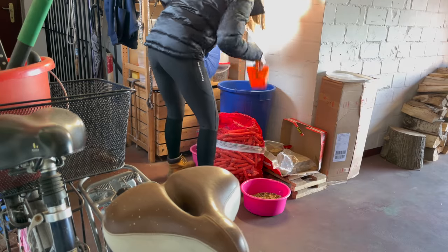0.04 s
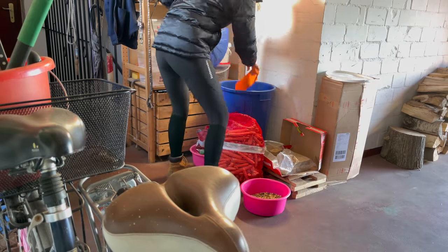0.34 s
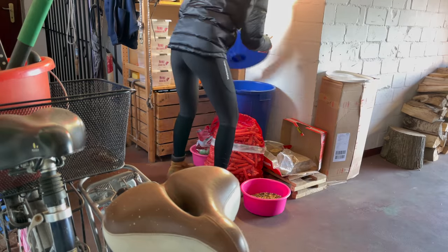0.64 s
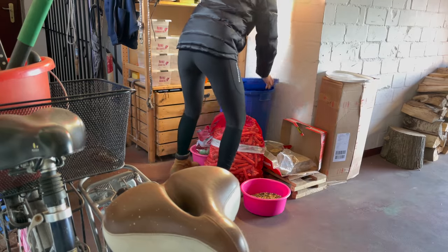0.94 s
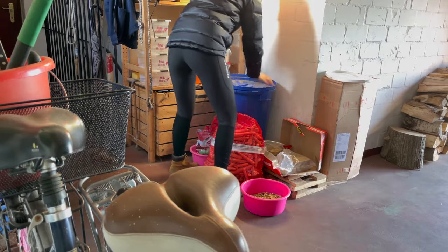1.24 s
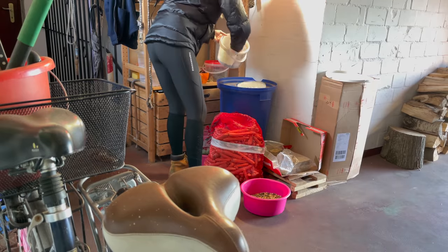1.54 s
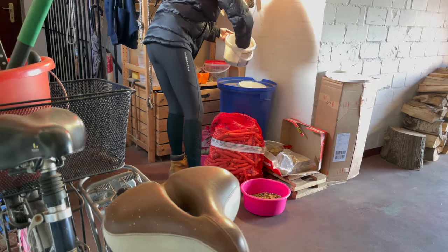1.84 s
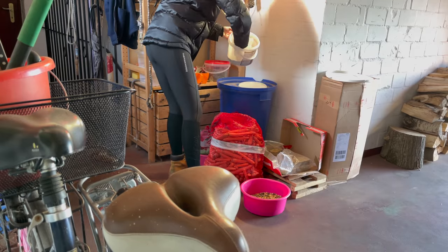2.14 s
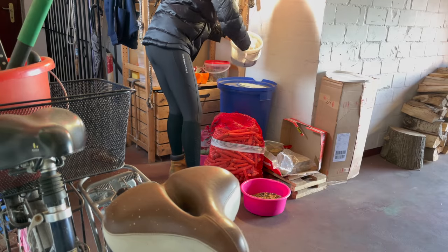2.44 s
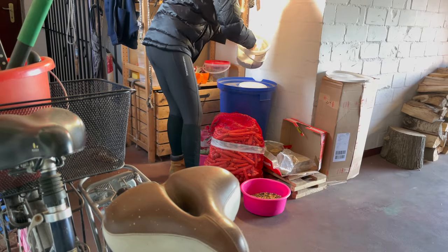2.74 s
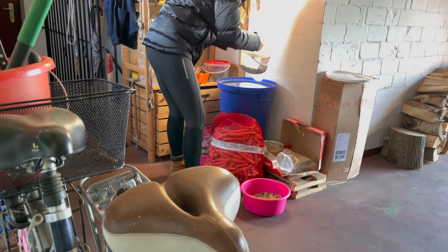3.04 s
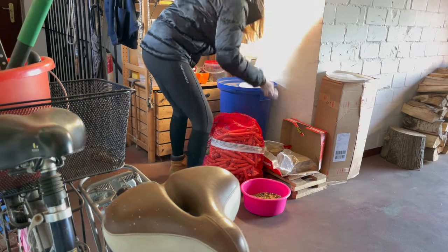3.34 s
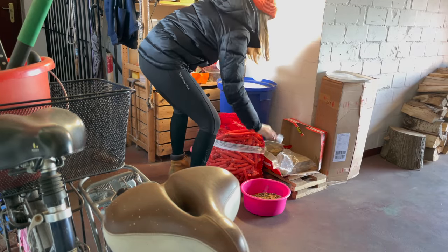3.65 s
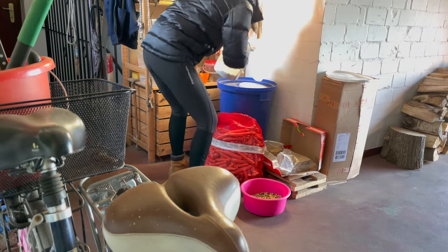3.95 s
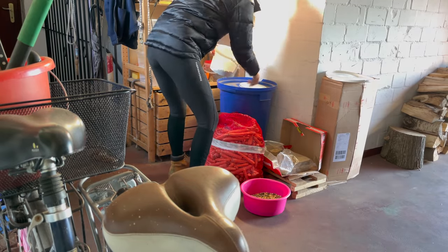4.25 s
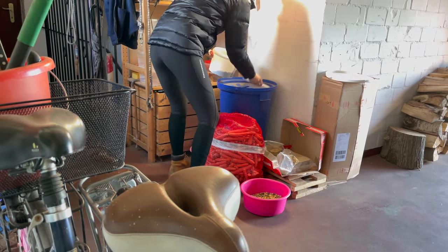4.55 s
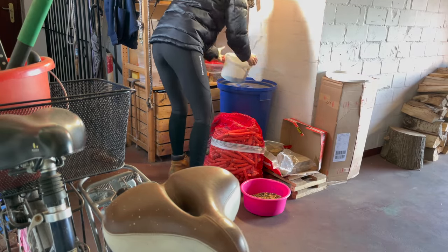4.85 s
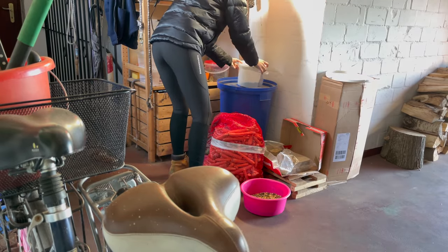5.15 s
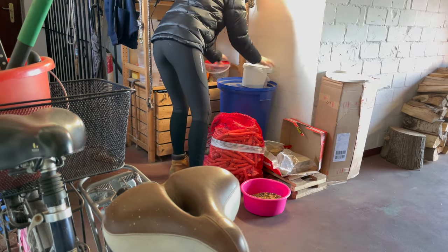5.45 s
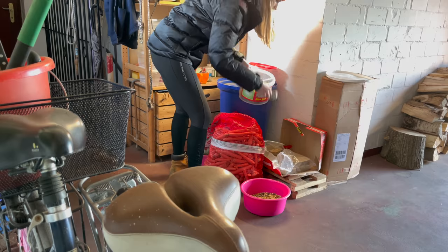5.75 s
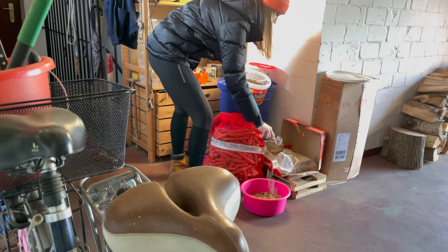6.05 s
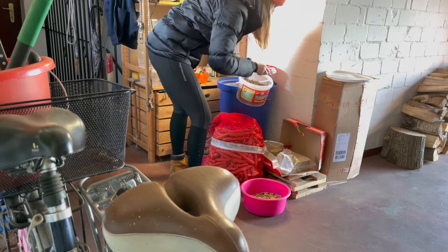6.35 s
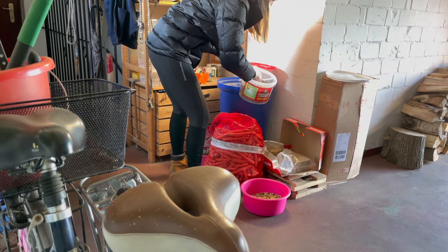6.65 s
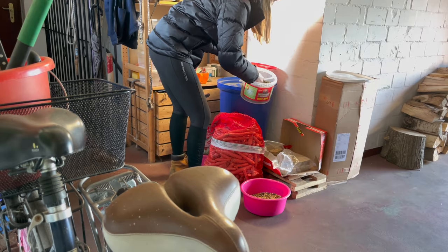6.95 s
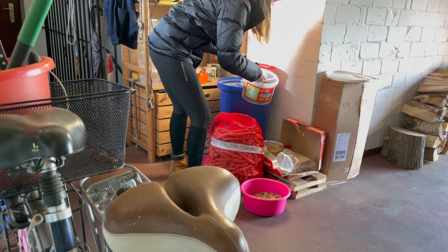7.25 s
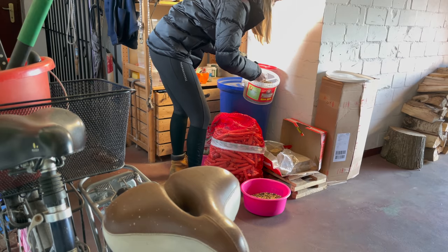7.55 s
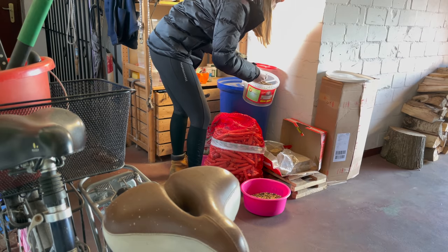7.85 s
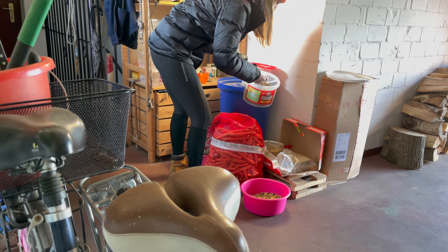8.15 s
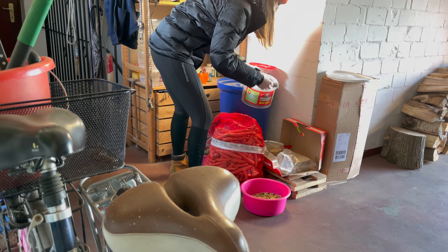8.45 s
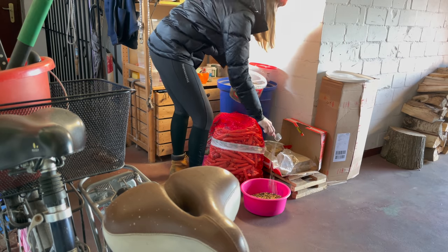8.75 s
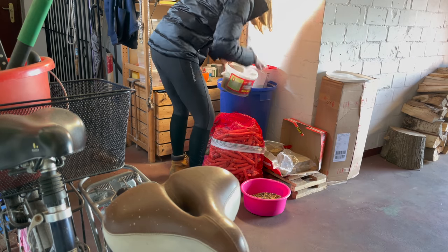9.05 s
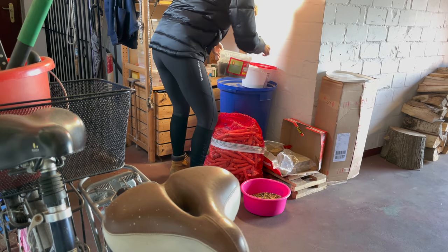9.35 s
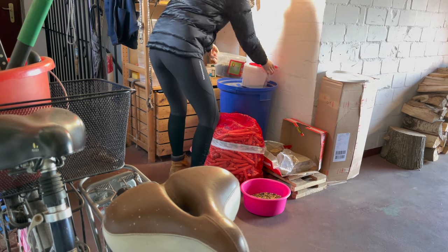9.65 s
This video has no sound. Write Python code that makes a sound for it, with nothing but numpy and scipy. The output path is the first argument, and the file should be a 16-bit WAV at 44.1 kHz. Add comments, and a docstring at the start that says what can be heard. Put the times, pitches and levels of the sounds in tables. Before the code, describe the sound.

Hollow plastic knocks and a booming lid, dry pellets sliding, and a measuring spoon digging, tapping and clattering in a store room.

```python
"""A plastic feed barrel is knocked and lidded a few metres away in a brick store room: the wall clacks
and rings, the air inside booms. A scoop is put down; dry feed slides and ticks in a tipped container.
A measuring spoon digs in a small tub, scrapes and taps its wall, and is dropped back in.
Three spoonfuls hiss into a bowl. A low drone wavers underneath."""
import sys
import numpy as np
from scipy import signal
from scipy.fft import rfft, irfft, next_fast_len
from scipy.io import wavfile
from scipy.ndimage import uniform_filter1d, map_coordinates

SR = 44100
rng = np.random.default_rng(int(sys.argv[2]) if len(sys.argv) > 2 else 0)


def inscribe(sig):
    """Save sig as 16-bit PCM at rate SR to the path in sys.argv[1].

    A 1-D sig is mono; a 2-D sig holds one channel per row.
    Samples are clipped to [-1, 1] before scaling.
    """
    pcm = np.round(np.clip(np.atleast_2d(sig).T, -1, 1) * 32767)
    wavfile.write(sys.argv[1], SR, pcm.astype(np.int16))


N = 432621

# friction on plastic: freq_hz, level_db
RUB_SPECTRUM = [(210, -12), (350, -6), (613, -9.5), (685, -8.5), (1240, -11), (1340, -4), (2390, -11.5),
                (4310, -17.5), (9000, -34), (11100, -22.5), (13600, -25), (16000, -37)]
# top treble of hard contacts: freq_hz, level_db
FIZZ_SPECTRUM = [(5000, 5.5), (8000, -6.5), (10500, -2), (13000, 4.5), (14500, 0), (16000, -27)]


def amp(db):
    """Decibels to gain."""
    return 10 ** (np.asarray(db) / 20)


def unit(x):
    """Scale to rms 1."""
    return x / np.sqrt(np.mean(x ** 2) + 1e-20)


def along(points, hz):
    """Interpolate (freq_hz, value) points on a log frequency axis."""
    knots_hz, values = np.transpose(points)
    return np.interp(np.log(hz + 1), np.log(knots_hz + 1), values)


def wobble(rate_hz):
    """Smooth random curve with rate_hz knots a second."""
    knots = rng.standard_normal(int(N * rate_hz / SR) + 4)
    return map_coordinates(knots, [np.arange(N) * rate_hz / SR])


def filtered(x, response):
    """Apply a complex frequency response."""
    size = x.shape[-1]
    padded = next_fast_len(size + 8192)
    return irfft(rfft(x, padded) * response(np.fft.rfftfreq(padded, 1 / SR)), padded)[..., :size]


def causal(x, gain):
    """Minimum-phase filter from gains on an even frequency grid."""
    cepstrum = irfft(np.log(gain + 1e-6))
    half = len(cepstrum) // 2
    cepstrum[1:half] *= 2
    cepstrum[half + 1:] = 0
    return signal.oaconvolve(x, irfft(np.exp(rfft(cepstrum))))[:len(x)]


def coloured(x, spectrum, size=2048):
    """Shape x by a (freq_hz, level_db) spectrum."""
    return causal(x, amp(along(spectrum, np.fft.rfftfreq(size, 1 / SR))))


def resonate(x, modes):
    """Parallel (freq_hz, width_hz, level_db) resonators."""
    return filtered(x, lambda f: sum(amp(db) * 1j * f * width / (hz * hz - f * f + 1j * f * width)
                                     for hz, width, db in modes))


def favour(hz, centre_hz, lift_db, octaves=0.3):
    """Boost in dB for modes near the struck spot's own pitch."""
    return lift_db * np.exp(-(np.log2(hz / centre_hz) / octaves) ** 2)


def swell(peak_s, db, rise_db_per_s, fall_db_per_s, hold_s=0, sag_db_per_s=0):
    """Envelope: builds until peak_s, sags while held, dies away."""
    age_s = np.arange(N) / SR - peak_s
    loss_db = (rise_db_per_s * np.maximum(-age_s, 0)
               + sag_db_per_s * np.clip(age_s, 0, hold_s)
               + fall_db_per_s * np.maximum(age_s - hold_s, 0))
    return amp(db - np.minimum(loss_db, 200))


def strokes(rows, rise_db_per_s, sag_db_per_s, fall_db_per_s):
    """Envelope of (start_s, length_s, level_db) movements of one shape."""
    return sum(swell(start_s, db, rise_db_per_s, fall_db_per_s, length_s, sag_db_per_s)
               for start_s, length_s, db in rows)


def grains(rate_hz, spread_db):
    """Tiny impacts at random times, mostly small, a few large."""
    place, size, sign = rng.random((int(rate_hz * N / SR), 3)).T
    strength = amp(spread_db * np.minimum(-np.log(1 - size), 4)) * np.sign(sign - .5)
    return unit(np.bincount((place * N).astype(int), strength, N))


def burst(t60_s, chatter_db, chatter_t60_s, rise_s, size=8192):
    """Contact: a pitchless crack as surfaces meet, then weaker chatter of loose plastic."""
    t = np.arange(size) / SR
    onset = 1 - np.exp(-t / max(rise_s, 1e-4))
    decay = amp(-60 * t / t60_s) + amp(chatter_db - 60 * t / chatter_t60_s)
    crack = rng.standard_normal(size) * onset * decay
    power = np.abs(uniform_filter1d(np.abs(rfft(crack)) ** 2, size=21))
    return causal(crack, (power / power.mean() + 1e-3) ** -0.35)  # partial whitening


def ring(modes, attack_s, scatter_db, detune=0.032, size=16384):
    """Damped modes, struck at a new spot each time."""
    t = np.arange(size) / SR
    tones = np.zeros(size)
    for hz, db, t60_s in modes:
        cycles = hz * (1 + detune * rng.normal()) * t + rng.random()
        tones += amp(db + scatter_db * rng.normal() - 60 * t / t60_s) * np.sin(2 * np.pi * cycles)
    return tones * (1 - np.exp(-t / attack_s))


def add(track, start_s, db, hit):
    """Mix in a hit, its first 1024 samples at rms level db."""
    start = round(start_s * SR)
    opening_rms = np.sqrt(np.mean(hit[:1024] ** 2))
    track[start:start + len(hit)] += (amp(db) * hit / opening_rms)[:N - start]


def diffuse(pair):
    """Room field from two unrelated signals: alike in the bass, unrelated above."""
    # left-right likeness: freq_hz, coherence
    likeness = [(60, 0.99), (130, 0.97), (290, 0.54), (600, 0), (8000, 0.043)]

    def mid_side_gains(hz):
        angle = np.arccos(np.clip(along(likeness, hz), -1, 1)) / 2
        return np.array([np.cos(angle), np.sin(angle)])

    mid, side = filtered(pair, mid_side_gains)
    return np.array([mid + side, mid - side])


def even(tail):
    """Level a reverb tail's chance peaks so the walls add no note."""
    power = np.abs(rfft(tail[:4096])) ** 2
    near, broad = (np.abs(uniform_filter1d(power, size=bins)) + 1e-12 for bins in (9, 121))
    return causal(tail, np.sqrt(broad / near))


def in_room(x, wet_db, left_db, block=24576, overlap=1024):
    """Direct sound, left microphone first, plus wall reflections that vary as things move."""
    # room decay: freq_hz, t60_s
    decay = [(100, 0.67), (300, 0.87), (1000, 0.6), (2500, 0.43), (6000, 0.45), (14000, 0.25)]
    # reverb colour: freq_hz, level_db
    wet_spectrum = [(60, -18.5), (130, -5), (300, 1.5), (16000, 3)]
    hz, t, noise = signal.stft(rng.standard_normal((2, 3 * SR)), SR, nperseg=256)
    length = SR * 2 // 3
    count = length // 128 + 2
    age_s = np.arange(length) / SR
    fade = amp(-60 * t[:count] / along(decay, hz)[:, None])
    early = (1 - np.exp(-age_s / 0.00029)) * (1 + 2.6 * np.exp(-age_s / 0.0055))  # near walls loudest
    window = np.sqrt(np.abs(signal.windows.tukey(block, 2 * overlap / block)))
    wet = np.zeros((2, N + block + length))
    for start in range(0, N, block - overlap):  # new tail per block
        piece = x[start:start + block] * window[:N - start]
        frames = noise[..., rng.integers(noise.shape[-1] - count):][..., :count]
        tail = signal.istft(frames * fade, SR, nperseg=256)[1][:, :length] * early
        tail = np.array([even(side) for side in tail])
        reverb = signal.fftconvolve(piece[None], tail / np.linalg.norm(tail[0]), axes=1)
        wet[:, start:start + reverb.shape[1]] += reverb
    wet = filtered(diffuse(wet[:, :N]), lambda f: amp(along(wet_spectrum, f)))
    lag_s = 20 / SR
    right = filtered(x, lambda f: np.exp(-2j * np.pi * f * lag_s))
    return np.array([amp(left_db) * x, right]) + amp(wet_db) * wet


def background(drone_hz=52.0):
    """A distant, wavering drone over the still air of the room."""
    # drone envelope: time_s, level_db
    drone_levels = [(0, -73), (.95, -51), (5.529, -43.5), (5.6, -31.5), (5.78, -42), (5.87, -35),
                    (6.57, -35.5), (6.67, -42.5), (7.0, -33), (7.3, -36), (7.52, -46.5), (7.65, -34.5),
                    (8.0, -33.5), (8.08, -41), (8.18, -33), (8.4, -30.5), (8.55, -36.5), (8.8, -33.5),
                    (9.05, -43), (9.4, -36.5), (9.81, -34.5)]
    # room air: freq_hz, level_db
    air_spectrum = [(15, -57), (25, -6), (80, 2), (531, -20.5), (936, -11.5), (1840, -17), (2990, -29.5),
                    (4030, -27.5), (5570, -38.5), (7920, -37), (8590, -53), (11000, -31), (13600, -31),
                    (16000, -42)]
    phase = 2 * np.pi * np.cumsum(drone_hz + 1.985 * wobble(20)) / SR
    envelope = amp(np.interp(np.arange(N) / SR, *np.transpose(drone_levels)))
    drone = envelope * unit(np.sin(phase) * amp(1.9 * wobble(13)))
    air = np.array([coloured(rng.standard_normal(N), air_spectrum) for _ in range(2)])
    return drone + amp(-47.5) * unit(diffuse(air))


def handling():
    """Plastic and clothing catch and slip; the jostled barrel rumbles."""
    # rubbing: start_s, length_s, level_db
    rubs = [(0.0, 0.027, -32.5), (.61, 0.051, -33), (.99, 0.069, -44), (1.56, 0.26, -34), (3.15, 0.54, -51),
            (4.36, 0.16, -41.5), (4.88, 0.19, -41.5), (5.37, 0.087, -39.5), (9.4, 0.4, -45)]
    # barrel jostled: start_s, length_s, level_db
    jostles = [(.85, 0.29, -24.5), (1.4, 0.6, -27.5), (2.0, 0.32, -35), (2.74, 0.25, -32.5),
               (3.1, 0.43, -36), (4.33, 0.075, -38.5), (4.99, 0.11, -24.5), (5.2, 0.16, -35)]
    # barrel cavity: freq_hz, level_db
    cavity_spectrum = [(40, -36), (65, -18), (87, 4), (115, -5.5), (140, 12), (175, -2.5), (225, -11.5),
                       (330, -7), (430, -16), (600, -22), (900, -59)]
    rub = unit(coloured(grains(rate_hz=1500, spread_db=4.0) * amp(0.75 * wobble(30)), RUB_SPECTRUM))
    hollow = unit(coloured(grains(rate_hz=270, spread_db=4.5), cavity_spectrum))
    rubbing = strokes(rubs, rise_db_per_s=258, sag_db_per_s=8, fall_db_per_s=178)
    jostling = strokes(jostles, rise_db_per_s=296, sag_db_per_s=10.5, fall_db_per_s=145)
    return amp(-6.0) * rubbing * rub + amp(-5.0) * jostling * hollow


def bowl():
    """Fine granules rain in small clumps on the feed in the bowl."""
    # spoonfuls landing: start_s, length_s, level_db
    spoonfuls = [(3.592, 0.082, -37), (6.005, 0.14, -36), (8.787, 0.12, -33)]
    # granule hiss: freq_hz, level_db
    hiss_spectrum = [(150, -11), (250, -4.5), (380, -3.5), (484, -0.5), (816, -9), (1000, -9.5),
                     (1790, -10.5), (2360, -7), (3120, -14.5), (4990, -10.5), (5540, -16.5), (6700, -12.5),
                     (8400, -13), (9330, -15), (13400, 4), (16000, -15.5)]
    shower = strokes(spoonfuls, rise_db_per_s=4000, sag_db_per_s=-1.5, fall_db_per_s=249)
    clumps = grains(rate_hz=3900, spread_db=5.5) * amp(2.5 * wobble(70))
    return shower * unit(coloured(clumps, hiss_spectrum))


def spoon_clicks():
    """Spoon and handles clink or knock, and a first pellet strikes the bowl; the contact spot sets the main
    resonance."""
    # light contacts: start_s, level_db, pitch_hz, width_hz, rise_s
    clicks = [(.394, -48, 1800, 1210, 0.016), (3.483, -35, 3300, 550, 0.0045),
              (3.645, -37, 2190, 2200, 0.0021), (3.807, -46.5, 2010, 1490, 0.0019),
              (5.794, -33, 3140, 450, 0.0098), (6.006, -41.5, 1290, 700, .0004),
              (6.110, -30.5, 2400, 380, 0.0008), (6.113, -36, 1480, 260, 0.00074),
              (6.202, -39, 2240, 450, 0.00049), (8.529, -44, 3120, 400, 0.01),
              (8.557, -38.5, 3030, 700, 0.019), (8.788, -44, 1800, 2000, .0004),
              (8.833, -39, 2390, 1800, .0005)]
    tilt_hz_db = [(500, -6.0), (1300, 11.0), (6500, 2.5), (9000, -1.5)]
    out = np.zeros(N)
    for start_s, db, pitch_hz, width_hz, rise_s in clicks:
        contact = burst(t60_s=0.0079 + 4 * rise_s, chatter_db=-51, chatter_t60_s=0.12, rise_s=rise_s)
        click = resonate(contact, [(pitch_hz, width_hz, 0), (6100, 500, -12)])
        add(out, start_s, db, coloured(click, tilt_hz_db))
    return out


def dropped_spoon():
    """The spoon lands on one end, then the other, and clatters against the tub."""
    # bounces: start_s, level_db, pitch_hz
    bounces = [(9.235, -27, 12500), (9.243, -30, 3000), (9.256, -38.5, 1900), (9.295, -43, 3000),
               (9.345, -40, 1800), (9.368, -42, 1900)]
    # spoon resonances: freq_hz, width_hz, level_db
    spoon_modes = [(488, 62, -0.5), (1540, 200, -16), (1807, 100, 5), (2160, 290, -3), (2995, 130, 4.5),
                   (4740, 1500, -9), (6100, 660, -6.5), (8300, 240, -4), (11700, 430, 1), (13300, 500, 1)]
    out = np.zeros(N)
    for start_s, db, pitch_hz in bounces:
        flex = 1 + 0.005 * rng.normal()
        modes = [(hz * flex, width_hz, mode_db + favour(hz, pitch_hz, lift_db=6.0))
                 for hz, width_hz, mode_db in spoon_modes]
        contact = burst(t60_s=0.015, chatter_db=-10, chatter_t60_s=0.09, rise_s=0.00074)
        add(out, start_s, db - 1.0, resonate(contact, modes))
    return out


def pellets():
    """Single pellets tumble in the container: a dry tick with a fizz of crumbs."""
    # pellet impacts: start_s, level_db, pitch_hz, fizz_offset_db
    tumbles = [(1.559, -33, 1800, -17), (1.823, -34.5, 1690, -26), (1.949, -36.5, 1900, -19),
               (1.986, -36.5, 1900, -18), (2.076, -34, 3130, -8), (2.297, -32, 2860, -23),
               (2.36, -39, 3000, -23), (2.562, -34, 2020, -16), (2.69, -35.5, 1680, -29),
               (2.717, -43, 1400, -24), (2.754, -49, 1500, -0.5), (2.776, -47, 2200, -2),
               (2.823, -40, 1620, -20), (2.864, -48, 3780, -5), (2.89, -44, 1310, -17),
               (2.926, -47, 1400, -21), (2.945, -39.5, 1600, -21), (3.122, -45.5, 1700, -34),
               (3.179, -56, 1300, -28), (3.435, -53, 3500, 0)]
    # pellet tick: freq_hz, level_db
    tick_spectrum = [(300, -19), (900, 9), (1900, -3.5), (3000, -6), (4800, -9), (6000, -30), (9000, -47)]
    out = np.zeros(N)
    for start_s, db, pitch_hz, fizz_offset_db in tumbles:
        contact = burst(t60_s=0.015, chatter_db=-32, chatter_t60_s=0.064, rise_s=0.0008)
        spectrum = [(hz, band_db + favour(hz, pitch_hz, lift_db=17.5)) for hz, band_db in tick_spectrum]
        add(out, start_s, db - 4.5, coloured(contact, spectrum))
        add(out, start_s, db + fizz_offset_db, coloured(contact, FIZZ_SPECTRUM))
    return out


def sliding_feed():
    """Dry grains surge over plastic, hissing at full flow, thinning to single ticks."""
    # tips of the container: peak_s, level_db, fall_db_per_s
    pours = [(2.113, -25.5, 54), (2.298, -35.5, 148), (2.365, -44, 147), (2.585, -42, 95)]
    # sliding grains: freq_hz, level_db
    slide_spectrum = [(130, -31), (220, -7), (351, -5.5), (450, -1.5), (560, -13), (772, -19.5),
                      (1050, -3.5), (1800, -6.5), (3070, -6.5), (4400, -11.5), (5550, -21.5), (6300, -18.5),
                      (7500, -24.5), (9340, -36), (13600, -25), (16000, -52)]
    # hollow notes of the container: freq_hz, width_hz, level_db
    container_modes = [(331, 45, 2), (442, 47, 0.5)]
    flow = sum(swell(peak_s, db, rise_db_per_s=234, fall_db_per_s=fall) for peak_s, db, fall in pours)
    fullness = flow / flow.max()
    slide = unit(coloured(grains(rate_hz=1300, spread_db=5.5) * amp(0.8 * wobble(60)), slide_spectrum))
    spray = unit(coloured(grains(rate_hz=3000, spread_db=2.5), FIZZ_SPECTRUM))
    crumbs = unit(coloured(grains(rate_hz=170, spread_db=7.0), RUB_SPECTRUM))
    hollow = unit(resonate(grains(rate_hz=440, spread_db=4), container_modes))
    trickle = swell(2.46, -47.5, rise_db_per_s=112, fall_db_per_s=117, hold_s=0.42, sag_db_per_s=19)
    drumming = swell(2.295, -45.5, rise_db_per_s=60, fall_db_per_s=162, hold_s=0.36)
    stream = flow * (amp(-3.5) * slide + amp(-8) * fullness * spray)
    return stream + trickle * crumbs + drumming * hollow


def spoon_in_tub():
    """The spoon crunches through clumped granules, scrapes and taps the tub's ringing wall."""
    # digging: start_s, length_s, level_db
    digs = [(5.81, 0.038, -43), (5.935, 0.025, -42), (6.53, 0.19, -47), (6.85, 0.78, -51),
            (7.9, 0.28, -52.5), (8.57, 0.018, -47), (8.632, 0.11, -45)]
    # crushed granules: freq_hz, level_db
    crunch_spectrum = [(210, -51), (350, -5), (459, -6), (584, -10), (914, -1.5), (990, -10), (1900, -8),
                       (2500, 2), (3390, -4.5), (4450, -6.5), (5060, 3), (5570, -11), (6030, -1.5),
                       (7670, -14), (13600, -2), (16000, -27)]
    # tub resonances: freq_hz, width_hz, level_db
    tub_modes = [(466, 38, 2.5), (1580, 250, -9.5), (1995, 130, -0.5), (2420, 380, -4.5), (3056, 96, -4.5),
                 (3730, 860, -20), (5020, 76, -5.5), (5940, 120, -10), (8000, 150, -17), (11300, 120, -5.5),
                 (13100, 710, -12)]
    # spoon rim along the wall: start_s, length_s, level_db, pitch_hz
    scrapes = [(6.66, 0.29, -40.5, 2000), (6.955, .07, -43, 2490), (7.23, .27, -57, 2600),
               (7.82, 0.39, -57, 2600)]
    # spoon striking the wall: start_s, tick_db, ring_db, pitch_hz
    taps = [(6.508, -16, -19, 3750), (6.526, -28, -16.5, 1370), (6.612, -15, -13.5, 1900),
            (6.616, -7, -18, 3180), (6.644, -17, -17, 1900), (6.6732, -16, -18, 3100),
            (6.813, -37, -27, 1900), (6.839, -26, -24, 1950), (7.0048, -17.5, -35, 2450),
            (7.139, -47, -33.5, 2580), (7.225, -27, -37, 5200), (7.304, -33, -44, 2600),
            (7.34, -25, -35, 2570), (7.408, -27.5, -39, 2580), (7.4788, -19, -38, 5100),
            (7.632, -36, -42.5, 2660), (7.687, -36, -45, 2600), (7.812, -27.5, -41, 2700),
            (7.89, -31.5, -51, 2600), (7.942, -32, -46, 2600), (8.046, -21, -38, 5060),
            (8.111, -24, -46, 2600), (8.14, -21.5, -43, 2660), (8.22, -34.5, -67, 2600),
            (8.269, -35, -63, 5100), (8.631, -22, -47, 5100)]
    # contact tick: freq_hz, level_db
    tick_spectrum = [(1000, -11.5), (3000, -6), (6500, -10), (7600, -8), (9500, -6), (11500, -2.5),
                     (13500, 3), (14700, -6), (16000, -9)]
    crush = grains(rate_hz=410, spread_db=4.5) * amp(1.8 * wobble(60))
    digging = strokes(digs, rise_db_per_s=610, sag_db_per_s=10.0, fall_db_per_s=300)
    out = amp(2.5) * digging * unit(coloured(crush, crunch_spectrum))
    for start_s, length_s, db, pitch_hz in scrapes:
        stroke = swell(start_s, db, rise_db_per_s=300, fall_db_per_s=260,
                       hold_s=length_s, sag_db_per_s=20)
        wall = [(hz, width_hz, mode_db + favour(hz, pitch_hz, lift_db=6.0))
                for hz, width_hz, mode_db in tub_modes]
        out += amp(-4.0) * stroke * unit(resonate(grains(rate_hz=400, spread_db=3.5), wall))
    for start_s, tick_db, ring_db, pitch_hz in taps:
        flex = 1 + 0.021 * rng.normal()  # soft wall bends under the spoon
        wall = [(hz * flex, width_hz, mode_db + favour(hz, pitch_hz, lift_db=15.5))
                for hz, width_hz, mode_db in tub_modes]
        tick = burst(t60_s=0.015, chatter_db=-19.5, chatter_t60_s=0.1, rise_s=0.00069)
        strike = burst(t60_s=0.021, chatter_db=-13.5, chatter_t60_s=0.16, rise_s=0.0014)
        add(out, start_s, tick_db - 21.0, coloured(tick, tick_spectrum))
        add(out, start_s, ring_db - 11.5, resonate(strike, wall))
    return out


def lid(boom_hz=81):
    """The lid goes down on a cushion of air, which booms at the barrel's lowest note."""
    phase = 2 * np.pi * np.cumsum(boom_hz + 3 * wobble(13.2)) / SR
    press = swell(peak_s=1.18, db=-10.5, rise_db_per_s=101, fall_db_per_s=280)
    return press * unit(np.sin(phase))


def barrel():
    """Each blow clacks and snaps, brighter when harder, rings the wall and pumps the air inside."""
    # blows on barrel and lid:
    # start_s, level_db, clack_hz, hardness_db, wall_db, wall_hz, t60_ratio, boom_db, rise_s
    knocks = [(.481, -21.5, 1500, 20.5, -30, 580, 1, -58, 0.0062),
              (0.5658, -18.5, 786, 5, -23.5, 550, 1.1, -38, 0.0025),
              (.796, -15.5, 2640, 6.5, -15.5, 305, 1, -34, 0.00031),
              (.907, -22.5, 1890, 6.5, -20.5, 231, 1.1, -42, 0.0015),
              (1.026, -23, 1490, -10, -20.5, 242, .6, -24, 0.0058),
              (1.127, -18.5, 2570, -0.5, -17.5, 252, 0.56, -22.5, 0.0021),
              (1.361, -36, 1300, -26, -46, 150, 0.88, -30, 0.0054),
              (1.408, -27.5, 1020, -6, -25.5, 136, 0.71, -23.5, 0.028),
              (1.586, -27, 1200, 12, -34, 327, 1.2, -34.5, .0088),
              (1.628, -25, 1210, 8, -27.5, 135, 0.91, -25, 0.0084),
              (1.749, -30, 1210, 12, -42, 135, 1, -35, 0.0029),
              (1.883, -28, 1030, 0.5, -33.5, 140, 1.4, -37, .0035),
              (2.024, -28.5, 1910, 8, -39, 136, 1, -32.5, 0.0004),
              (4.12, -27.5, 1600, 11.5, -38, 540, 0.88, -62, 0.0046),
              (4.165, -23, 1100, 9, -19.5, 179, 0.8, -55, 0.003),
              (4.176, -36.5, 560, 2, -23, 544, .7, -62, 0.0018),
              (4.196, -35, 5000, 25.5, -24, 418, 0.6, -61, .004),
              (4.33, -43.5, 2600, 15, -39, 170, .7, -54, .0022),
              (4.422, -36, 1190, -11, -30.5, 365, 0.58, -56, 0.0022),
              (4.475, -33.5, 1490, -8, -44, 398, .7, -42, 0.0022),
              (4.528, -43, 1694, 5, -57, 300, 0.89, -48, .0015),
              (4.832, -21, 1820, 2.5, -23, 403, 0.84, -58, 0.0043),
              (4.955, -29.5, 1600, 17, -28, 358, .7, -53, .017),
              (4.983, -25, 1360, -32, -22, 252, 0.84, -41, 0.0085),
              (5.12, -35, 3000, 18, -27, 224, 0.84, -40, .00041),
              (5.213, -27, 820, -36, -20.5, 136, 0.85, -17.5, 0.0044),
              (5.311, -34, 1100, -25, -26, 181, 0.54, -34.5, .0024),
              (5.4552, -27.5, 1700, 13, -57, 160, 0.95, -54, 0.00065),
              (5.526, -38, 1600, 12, -52, 200, 0.92, -62, 0.0027),
              (9.721, -37.5, 2050, 12.5, -32.5, 192, 1.3, -42, 0.0011)]
    # panel clack: freq_hz, level_db
    clack_spectrum = [(150, -15), (380, -3), (540, 2), (800, 2), (1100, 4.5), (1600, 0.5), (2300, -5),
                      (3200, -14), (5000, -15), (9000, -78)]
    # contact snap: freq_hz, level_db
    snap_spectrum = [(800, -30), (2000, 3.5), (2400, 5), (3700, 5), (4600, -2.5), (5600, -10), (6300, -7),
                     (8000, -14), (11000, -67)]
    # barrel wall: freq_hz, level_db, t60_s
    wall_modes = [(132.2, -1.5, .22), (160, -3, 0.33), (201.7, 3.5, 0.22), (249.2, 2, 0.13),
                  (304.3, -1.5, 0.15), (333.3, -1.5, .15), (383, -2.5, .17), (419, -4, 0.18),
                  (464, 0.5, 0.11), (546, -1.5, 0.11)]
    # enclosed air and lid: freq_hz, level_db, t60_s
    air_modes = [(81.6, -4, 0.43), (100.2, -6, 0.44), (120.7, -6.5, 0.38)]
    out = np.zeros(N)
    for start_s, db, clack_hz, hardness_db, wall_db, wall_hz, t60_ratio, boom_db, rise_s in knocks:
        contact_s = 0.016 + 5 * rise_s  # soft, glancing blows touch longer
        panel = [(hz, band_db + favour(hz, clack_hz, lift_db=7.5, octaves=0.66))
                 for hz, band_db in clack_spectrum]
        wall = [(hz, mode_db + favour(hz, wall_hz, lift_db=10.5), t60_s * t60_ratio)
                for hz, mode_db, t60_s in wall_modes]
        clack = burst(contact_s, chatter_db=-42, chatter_t60_s=0.14, rise_s=rise_s)
        snap = burst(contact_s, chatter_db=-55, chatter_t60_s=0.095, rise_s=rise_s)
        fizz = burst(contact_s, chatter_db=-44, chatter_t60_s=0.056, rise_s=rise_s)
        add(out, start_s, db - 3.0, coloured(clack, panel))
        add(out, start_s, db - 11.5 + 0.31 * hardness_db, coloured(snap, snap_spectrum))
        add(out, start_s, db - 23.5 + hardness_db, coloured(fizz, FIZZ_SPECTRUM))
        add(out, start_s, wall_db - 2.0, ring(wall, attack_s=0.0062, scatter_db=1.0, detune=0.02))
        add(out, start_s, boom_db - 0.6, ring(air_modes, attack_s=0.01, scatter_db=3.0))
    return out


def scene():
    """Barrel, tub and bowl share one spot; the reverb stops dead once, before the digging."""
    work = (barrel() + lid() + handling() + sliding_feed() + pellets()
            + spoon_in_tub() + spoon_clicks() + dropped_spoon() + bowl())
    break_s = 5.555
    before = np.arange(N) < break_s * SR
    room = sum(gate * in_room(gate * work, wet_db=1.5, left_db=-2.5) for gate in (before, ~before))
    return room + background()


def record(dry):
    """Unequal microphones; stereo widened near 10 kHz, narrowed above; peaks rounded; band-limited."""
    # microphone imbalance: freq_hz, left_minus_right_db
    imbalance = [(60, -4.5), (130, -2), (250, -1.5), (1500, 0.5), (4000, 3.5), (8000, 1)]
    side_hz_db = [(7000, -1), (8500, 6.5), (10000, 10.0), (11500, -23.5)]
    ceiling, top_hz = 0.92, 16000
    left, right = filtered(dry, lambda hz: amp(np.outer([.5, -.5], along(imbalance, hz))))
    mid = (left + right) / 2
    side = filtered((left - right) / 2, lambda hz: amp(along(side_hz_db, hz)))
    pair = np.array([mid + side, mid - side])
    rounded = pair / (1 + np.abs(pair / ceiling) ** 8) ** (1 / 8)
    return filtered(rounded, lambda hz: hz < top_hz)


dry = scene()
out = record(dry)
inscribe(out)
```